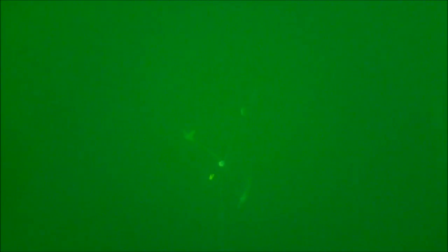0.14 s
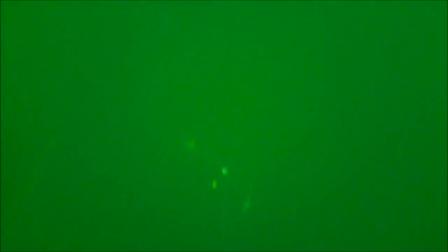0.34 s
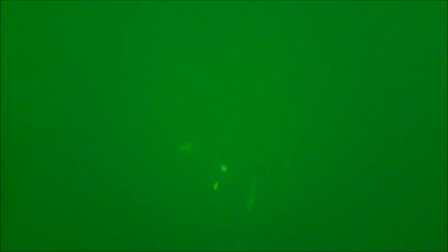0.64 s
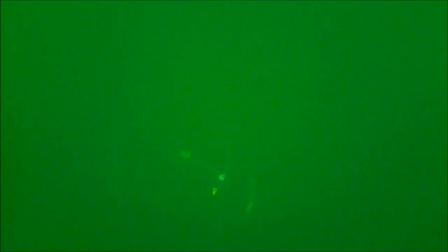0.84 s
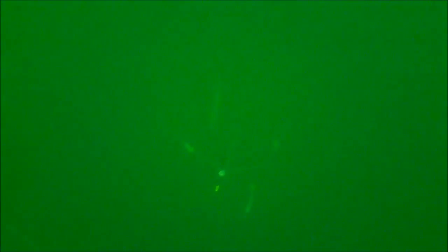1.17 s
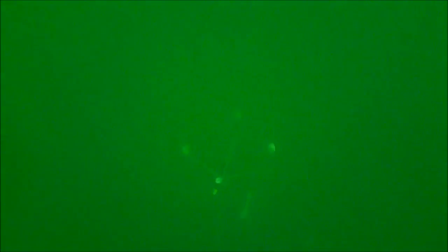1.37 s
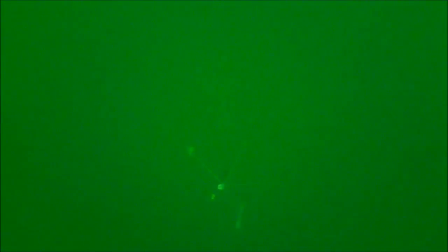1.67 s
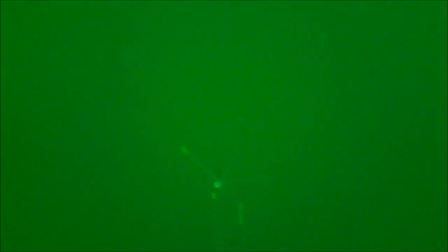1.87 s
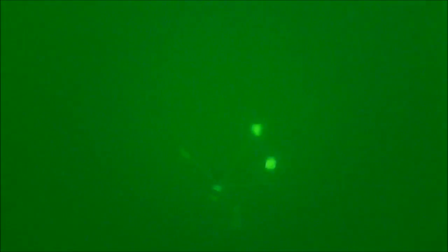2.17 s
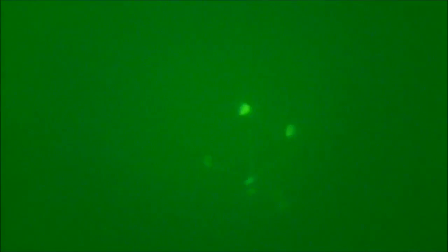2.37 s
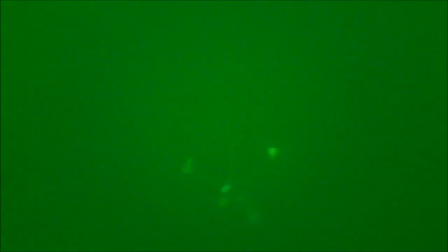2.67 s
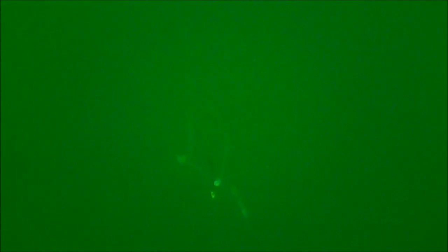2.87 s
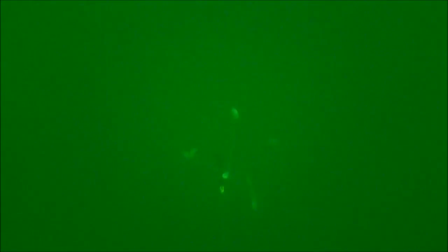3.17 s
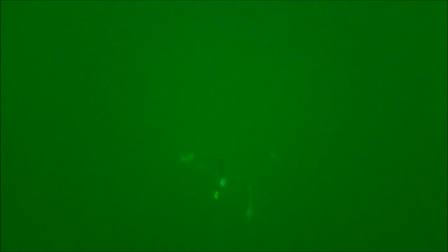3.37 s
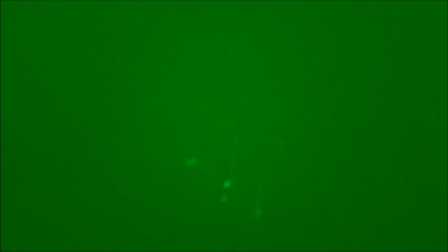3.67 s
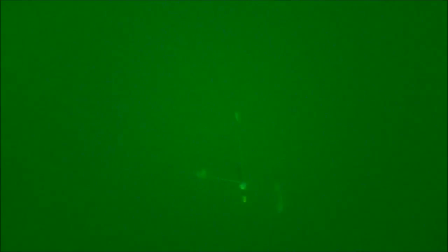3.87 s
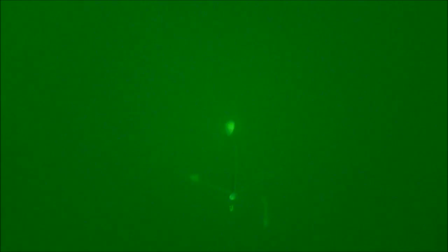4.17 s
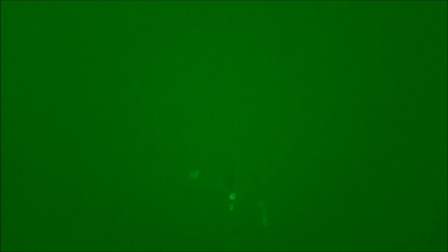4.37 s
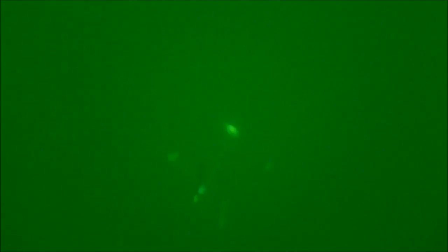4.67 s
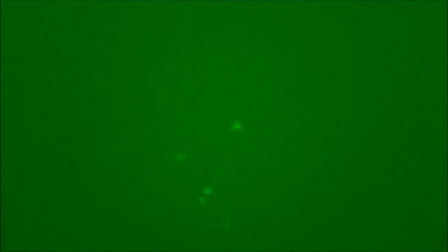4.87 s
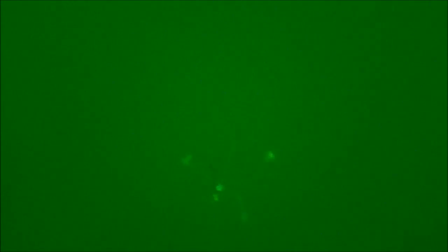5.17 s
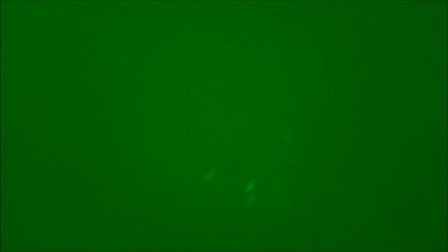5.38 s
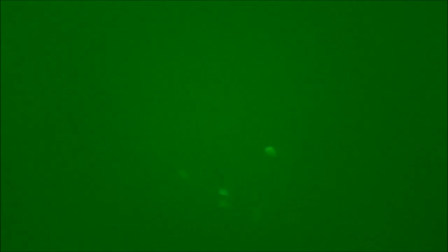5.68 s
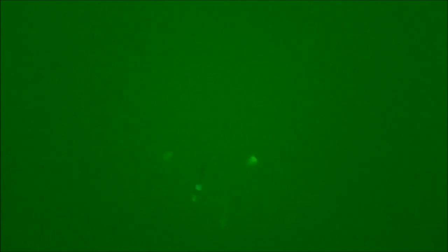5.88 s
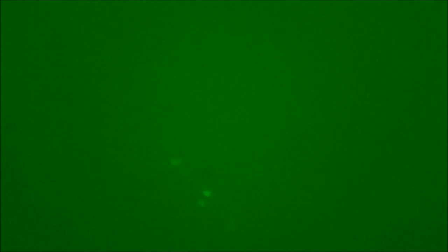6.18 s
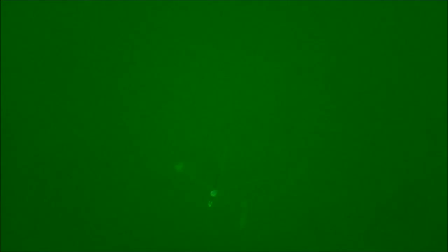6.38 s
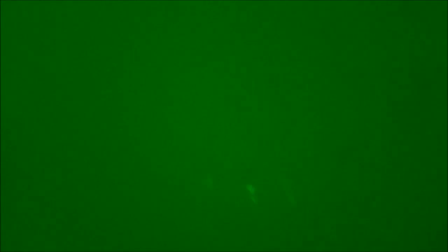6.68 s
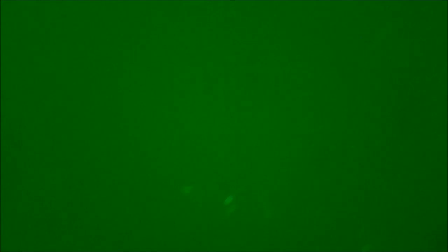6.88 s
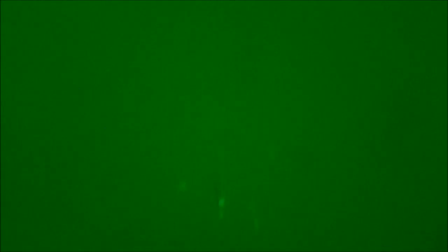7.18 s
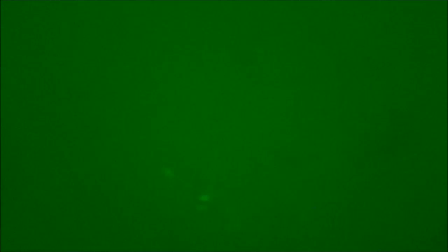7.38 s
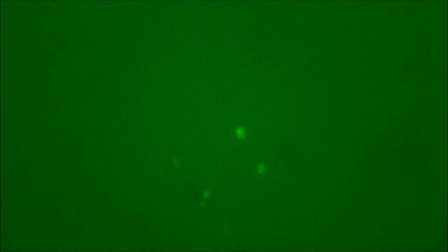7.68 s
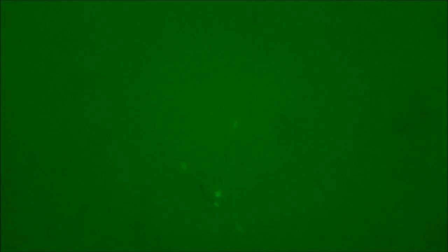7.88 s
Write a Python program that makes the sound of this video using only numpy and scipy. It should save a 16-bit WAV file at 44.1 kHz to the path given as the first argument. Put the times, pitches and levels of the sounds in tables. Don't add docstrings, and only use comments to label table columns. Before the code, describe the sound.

Underwater, inside a small resonant plastic case, an outboard boat is already close at 0 s. Its propeller makes a continuous, crackling hiss, hollow and metallic, strongest around 1.6 to 3.5 kHz with thinner treble fizz. Through it runs a rough gear whine near 1.7 kHz, easing at about 0.9 s and sliding slowly downward, its level wavering with passing waves. Faint engine hum comes and goes. Underneath are low water rumble, a rapid electrical flutter thirty times a second with a soft half-second pulse, irregular low line thrums and small muffled gurgles until about 6 s. The boat is loudest near 3 s, then fades steadily from 4 s, comb-like coloration shifting as it leaves. At 6.9 s two sharp snaps knock the housing, a tiny high squeak follows near 7.2 s and two weaker clicks at 7.3 s. Dwindling hiss and low hum continue to 8 s.

```python
import sys
import numpy as np
from scipy import signal
from scipy.fft import rfft, irfft
from scipy.io import wavfile
from scipy.ndimage import uniform_filter1d, map_coordinates

SR = 44100
rng = np.random.default_rng(int(sys.argv[2]) if len(sys.argv) > 2 else 0)


def put_to_file(sound):
    columns = np.atleast_2d(sound).T
    safe = np.clip(columns, -1, 1)
    whole_steps = np.round(safe * 32767)
    wavfile.write(sys.argv[1], SR, whole_steps.astype(np.int16))


def ratio(d):
    e = np.asarray(d, float) / 20
    return 10 ** e


N = 354123

# time_s, rate_hz
SHAFT = [(0.0, 61.32), (0.25, 59.72), (0.75, 58.7), (1.25, 56.93), (1.625, 56.18), (1.875, 55.15),
         (2.05, 55.22), (2.625, 54.21), (2.95, 53.45), (3.15, 53.5), (3.55, 52.82), (4.0, 52.31),
         (4.7, 50.65), (5.0, 50.32), (5.75, 48.92), (6.125, 48.08), (6.875, 46.02), (8.03, 44.35)]


def curve(table):
    s, *columns = np.transpose(table)
    return [np.interp(np.arange(N) / SR, s, c) for c in columns]


def level(x, db):
    return x * ratio(db) / np.sqrt(np.mean(x ** 2))


def ring(x, hz, width):
    return signal.lfilter(*signal.iirpeak(hz, hz / width, SR), x)


def walk(rate):
    k = int(SR / rate)
    held = np.repeat(rng.standard_normal(N // k + 1), k)
    w = uniform_filter1d(uniform_filter1d(held, k), k)[:N]
    return w / w.std()


def colour(points):
    hz, db = np.transpose(points)
    bins = np.maximum(np.fft.rfftfreq(N, 1 / SR), hz[0])
    gain = ratio(np.interp(np.log(bins), np.log(hz), db))
    return irfft(rfft(rng.standard_normal(N)) * gain, N)


def order(k, db, wobble=.2, fade_db=1.2):
    turns = np.cumsum(curve(SHAFT)[0]) / SR
    start = rng.uniform(0, 2 * np.pi)
    size = np.sqrt(2) * ratio(db + fade_db * walk(6))
    return size * np.sin(2 * np.pi * k * turns + start + wobble * walk(25))


def nearness():
    # time_s, level_db
    propeller = [(0.0, -43.5), (.35, -45), (.7, -44.5), (1.1, -43), (1.55, -43.5), (2.2, -43), (2.5, -43.0),
                 (3.0, -42), (3.5, -43.5), (4.3, -46), (4.65, -48.5), (5.1, -49), (5.6, -52), (6.1, -53.1),
                 (6.7, -56), (7.1, -55), (7.55, -54.5), (8.03, -55.5)]
    near_db = -42
    return curve(propeller)[0] - near_db


def waves_db():
    # centre_s, half_length_s, gain_db
    waves = [(.25, 0.22, 2.5), (1.15, 0.42, -3), (1.515, .08, 2), (1.801, 0.13, -3), (2.547, 0.18, 2.5),
             (3.894, 0.19, 2.5), (4.698, 0.26, -1.5), (5.697, .2, -0.5), (6.552, 0.48, 3),
             (7.349, .35, -2.5), (7.95, 0.21, 4.5)]
    t = np.arange(N) / SR
    return sum(db * np.exp(-((t - s) / half) ** 2) for s, half, db in waves)


def mirror(x):
    n = np.arange(N)
    nearest_s, come_s, go_s = 2.85, 2.95, 1.75
    surface_lag_s, surface_gain = .001315, .27
    bank_abeam_s, bank_go_s, bank_lag_s, bank_gain = 4.0, 1.3, .001375, .15
    handover_s, handover_length_s = 4.6, 1
    away = n / SR - nearest_s
    lag = surface_lag_s / np.sqrt(1 + (away / np.where(away < 0, come_s, go_s)) ** 2)
    bank_lag = bank_lag_s / np.sqrt(1 + ((n / SR - bank_abeam_s) / bank_go_s) ** 2)
    bank = np.clip((n / SR - handover_s) / handover_length_s + .5, 0, 1)
    dull = uniform_filter1d(x, size=3)
    surface_echo = map_coordinates(dull, [n - lag * SR], order=3)
    bank_echo = map_coordinates(dull, [n - bank_lag * SR], order=3)
    return x + surface_gain * (1 - 0.77 * bank) * surface_echo + bank_gain * bank * bank_echo


def cavitation():
    # centre_hz, width_hz, level_db
    housing = [
        [(1658, 200, 1), (1795, 154, 0.5), (2093, 290, -10)],
        [(2462, 341, -2), (2817, 163, -4), (2974, 198, 1), (3290, 240, -3.5), (3509, 119, 1), (3804, 238, -6),
         (4526, 187, -12), (4820, 99, -20.5), (5010, 140, -25)],
        [(5660, 390, 2.5), (6200, 480, -16.5), (6590, 350, -10), (6680, 400, -7.5), (7660, 380, -2),
         (7240, 220, -10), (8220, 290, -5)],
        [(10670, 440, 8), (11700, 410, -17), (12900, 310, 2.5), (14350, 900, -7)],
    ]
    # level_db, share
    hiss_groups = [(-48.5, 0.84), (-41.5, 0.99), (-51.5, .8), (-59.5, 0.77)]
    burst_db, crackle_db, flicker_db, patch_db = .15, .6, .5, .35
    bubbles = mirror(rng.standard_normal(N) * ratio(burst_db * walk(31) + crackle_db * walk(120)))
    out = 0
    for number, (modes, (db, share)) in enumerate(zip(housing, hiss_groups)):
        group = 0
        for k, (hz, width, mode_db) in enumerate(modes):
            mode = ring(ring(bubbles, hz, 1.65 * width), hz, 1.65 * width)
            group = group + (-1) ** k * ratio(mode_db + patch_db * walk(2.58)) * mode
        swell_db = share * nearness() + flicker_db * walk(25)
        if number == 0:
            swell_db = swell_db + waves_db()
        out = out + level(group, db) * ratio(swell_db)
    return out


def gear():
    # order, load_db, eased_db, phase_shake_rad
    teeth = [(25, -64, -66, .2), (26, -55, -60, .2), (27, -54, -55, .2), (28, -51, -60, .2),
             (29, -56, -62, .45), (30, -63, -43.5, .32), (31, -61, -50.5, .45), (32, -66, -51, .5),
             (33, -68, -55, .2)]
    ease_s, ease_length_s = .9, .15
    wall_hz, wall_width_hz = 1647.6, 154
    load_share = .2
    eased = np.clip((np.arange(N) / SR - ease_s) / ease_length_s + .5, 0, 1)
    shaft = curve(SHAFT)[0]
    path_db = 1.14 * nearness() + eased * waves_db()
    out = 0
    for k, load_db, ease_db, shake in teeth:
        detuning = 2 * (k * shaft - wall_hz) / wall_width_hz
        wall_db = -20 * np.log10(1 + detuning ** 2) * np.maximum(eased, load_share)
        tooth_db = load_db + (ease_db - load_db) * eased
        out = out + order(k, tooth_db + wall_db + path_db, wobble=shake, fade_db=1.5)
    return out


def heard_db(k):
    # order, start_s, end_s, level_db
    spells = [(6, 2.8, 4.3, -68), (6, 4.85, 5.1, -65), (6, 5.7, 6.6, -66), (6, 6.6, 8.03, -62.5),
              (12, 0, .6, -68), (12, 2.3, 4.3, -66.5), (14, 0, .4, -63), (14, .4, 1.35, -66),
              (14, 1.35, 2.6, -72), (18, 0, 1.7, -71), (18, 2.1, 4.0, -70), (18, 4.0, 4.5, -73),
              (18, 5.1, 5.6, -70), (13, 0, .5, -66), (19, 1.8, 2.3, -71)]
    fade_db_s, between_db = 58, -99
    t = np.arange(N) / SR
    levels = []
    for spell_order, start, end, db in spells:
        if spell_order == k:
            outside = np.maximum(np.maximum(start - t, t - end), 0)
            levels.append(db - fade_db_s * outside)
    return np.maximum(np.max(levels, axis=0), between_db)


def motor():
    # order, order_followed, relative_db
    weak_orders = [(10, 12, -12), (13, 14, -12), (19, 12, -10)]
    firing = sum(order(k, heard_db(k) - .4, wobble=.33, fade_db=1.5) for k in (6, 12, 13, 14, 18, 19))
    return firing + sum(order(k, heard_db(lead) + db) for k, lead, db in weak_orders)


def water():
    # frequency_hz, density_db (per Hz)
    turbulence = [(3, -0.5), (8, -3), (16, -7), (27, -26.5), (50, -17.5), (80, -18), (150, -25), (300, -30),
                  (600, -40), (1400, -39), (2500, -59)]
    flow = level(colour(turbulence), -51) * ratio(walk(3.09))
    wash = ring(rng.standard_normal(N), 870, 2400)
    wash = level(ring(wash, 760, 2160), -4.0) * ratio(-54 + 1.52 * nearness())
    return flow + wash + line() + surges()


def supply():
    frame_hz, frame_s, frame_db = 30, .0155, -38
    key_hz, key_s, key_db = 2, .018, -44
    poll_hz, poll_s, poll_db = 19.62, .0347, -52
    t = np.arange(N) / SR
    since = (t - frame_s) % (1 / frame_hz)
    frame = (1 - np.exp(-since / .0025)) * np.exp(-since / .008)
    since = (t - key_s) % (1 / key_hz)
    key = np.where(since < .036, .6 + 12 * since, -1.5 * np.exp(-(since - .036) / .045))
    key = uniform_filter1d(uniform_filter1d(key, size=330), size=330) * ratio(1.2 * walk(2))
    turn = 2 * np.pi * poll_hz * (t - poll_s)
    poll = np.sqrt(2) * (np.cos(turn) - .33 * np.cos(2 * turn)) * ratio(1.1 * walk(2))
    leak = ratio(frame_db + walk(20)) * frame + ratio(key_db) * key + ratio(poll_db) * poll
    leak = uniform_filter1d(leak, size=90)
    return leak - leak.mean()


def line():
    # centre_s, half_length_s, pitch_hz, level_db
    thrum = [(0.054, 0.099, 65, -46.5), (.43, .12, 68.3, -56), (.9, 0.2, 65.1, -55), (1.12, .1, 65.2, -49),
             (1.377, .1, 66, -52), (1.6, 0.091, 62.5, -56), (2.08, 0.12, 66, -54), (2.599, 0.17, 67, -61),
             (2.98, 0.11, 68.4, -49.5), (3.25, 0.094, 68, -55), (3.502, 0.15, 63.4, -48),
             (3.88, .08, 66.8, -58), (4.299, 0.36, 65.1, -69), (4.65, 0.089, 65.9, -53),
             (4.866, 0.12, 63.7, -52), (5.147, 0.17, 69.4, -46), (5.701, 0.24, 61, -61),
             (6.2, 0.18, 60.7, -48), (6.476, 0.13, 62.1, -52), (7.0, .12, 63, -65), (7.551, 0.17, 64, -65),
             (7.97, 0.11, 64.8, -57)]
    edge_db, slack_db = 8.5, -80.5
    t = np.arange(N) / SR
    s, _, hz, _ = np.transpose(thrum)
    swells = sum(ratio(db - edge_db * ((t - at) / half) ** 2) for at, half, _, db in thrum)
    size = (ratio(slack_db) + swells) * ratio(-3.5 + 0.7 * walk(8))
    phase = 2 * np.pi * np.cumsum(np.interp(t, s, hz)) / SR
    return np.sqrt(2) * size * np.sin(phase + 1.2 * walk(10))


def surges():
    # centre_s, half_length_s, pitch_hz, level_db
    gulps = [(0.662, .08, 150, -59), (1.05, 0.073, 150, -61), (1.796, 0.071, 151, -63),
             (2.1, .05, 120, -59), (2.817, .06, 165, -63), (4.048, 0.16, 160, -65.5), (4.4, 0.11, 131, -62),
             (5.52, .08, 144, -59), (5.917, 0.11, 155, -59), (6.097, .05, 190, -60)]
    t = np.arange(N) / SR
    noise = rng.standard_normal(N)
    out = 0
    for s, half, hz, db in gulps:
        gulp = level(ring(ring(noise, hz, 84), hz, 84), db)
        out = out + gulp * np.exp(-((t - s) / half) ** 2)
    return out


def tackle():
    # start_s, low_ring_db, high_ring_db
    snaps = [(6.8862, -50, -44), (6.9541, -38.5, -49), (7.2815, -56, -49), (7.3349, -56, -50)]
    # start_s, length_s, pitch_hz, level_db
    squeak_event = (7.155, .075, 6770, -65)
    low, high = np.zeros((2, N))
    rise = np.arange(500) / 70
    shape = rise * np.exp(1 - rise)
    for s, low_db, high_db in snaps:
        burst = rng.standard_normal(500) * shape
        low[int((s - .001) * SR):][:500] += ratio(low_db) * burst
        high[int(s * SR):][:250] += ratio(high_db) * burst[::2]
    s, length, hz, db = squeak_event
    since = np.arange(N) / SR - s
    swell = np.sin(np.pi * np.clip(since / length, 0, 1)) ** .5
    squeak = ratio(db) * swell * np.sin(2 * np.pi * hz * since + .8 * walk(80))
    low_ring = 1.1 * ring(ring(low, 3200, 1300), 3200, 1300)
    return low_ring + ring(high, 5800, 900) + ring(high, 7700, 1200) + squeak


def scene():
    return (cavitation() + gear() + motor() + water() + tackle())[None]


def low_pass(x):
    return signal.sosfilt(signal.butter(12, 15700, fs=SR, output="sos"), x)


def record(dry):
    hiss = colour([(100, 6.5), (1000, 1.5), (5000, -7.0), (10000, -8.0), (15000, -8.5), (22000, -28)])
    offset = .0146
    return low_pass(dry + level(hiss, -58.5) + supply() + offset)


dry = scene()
out = record(dry)
put_to_file(out)
```